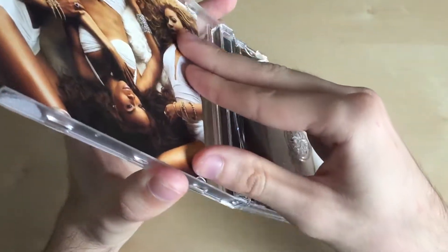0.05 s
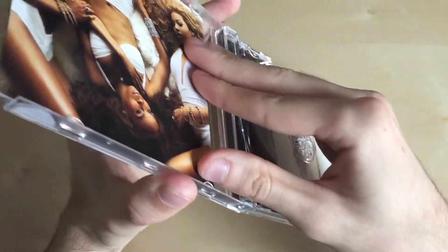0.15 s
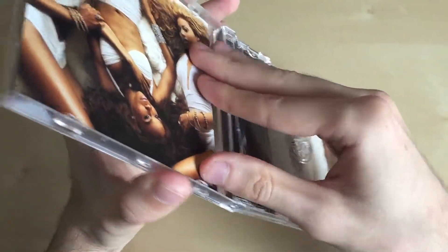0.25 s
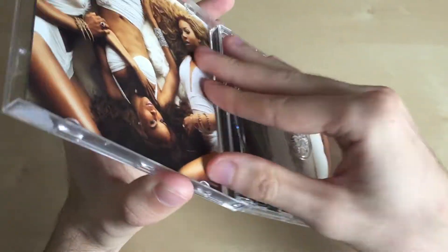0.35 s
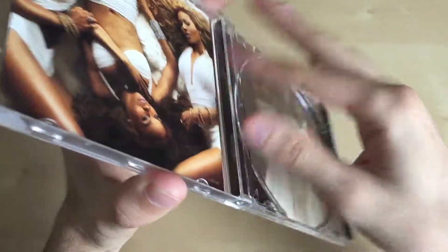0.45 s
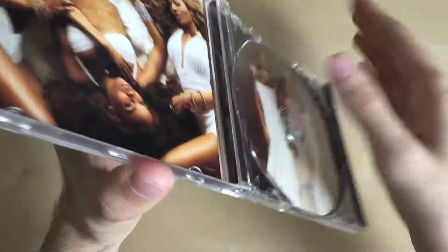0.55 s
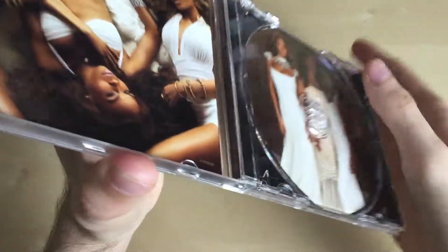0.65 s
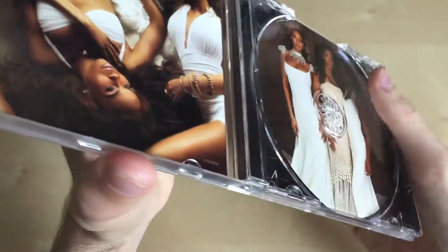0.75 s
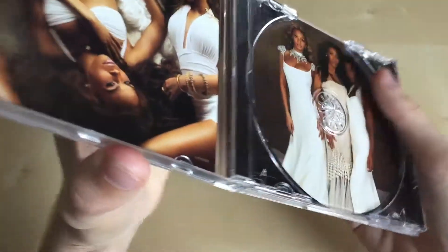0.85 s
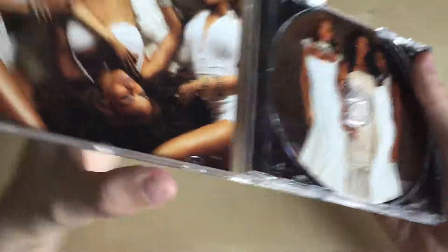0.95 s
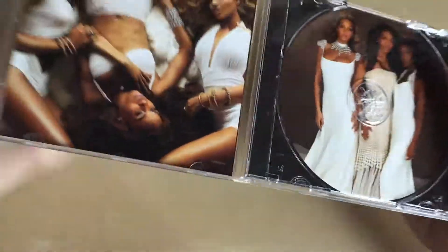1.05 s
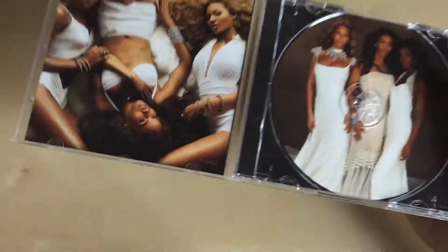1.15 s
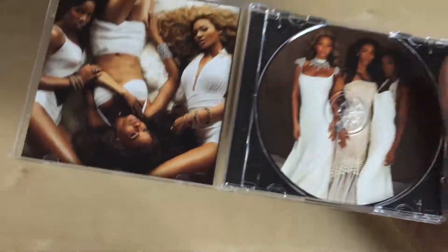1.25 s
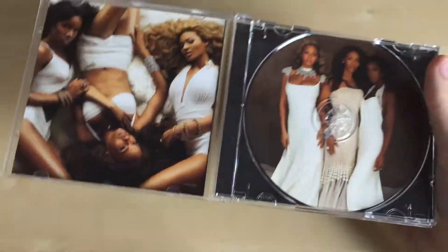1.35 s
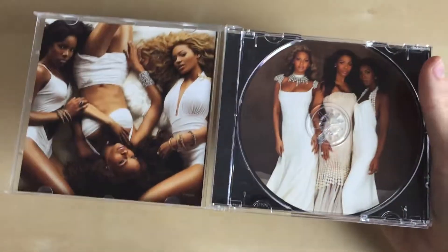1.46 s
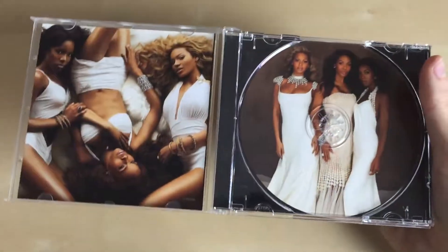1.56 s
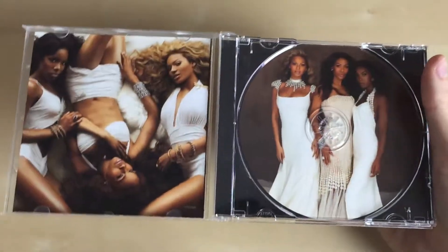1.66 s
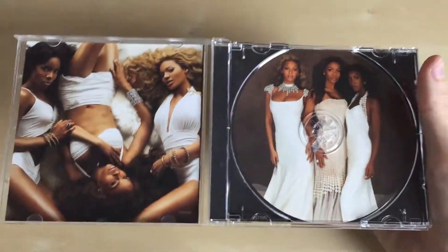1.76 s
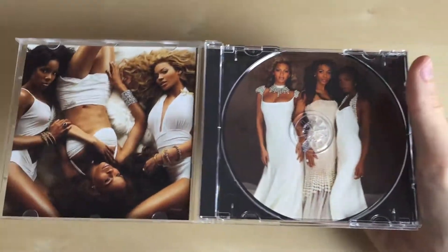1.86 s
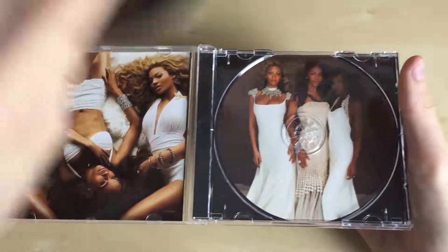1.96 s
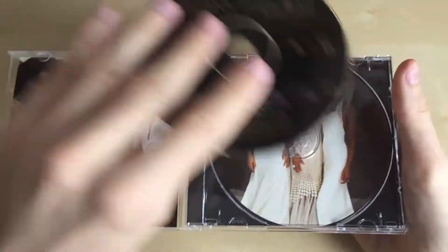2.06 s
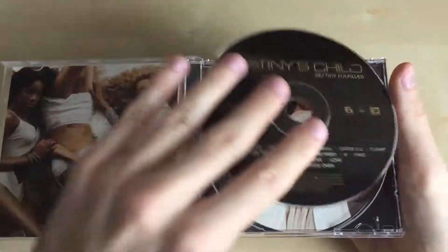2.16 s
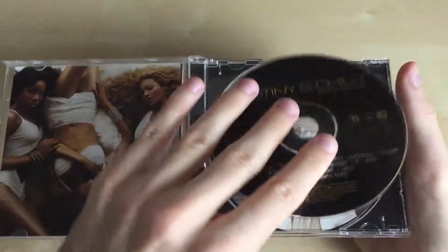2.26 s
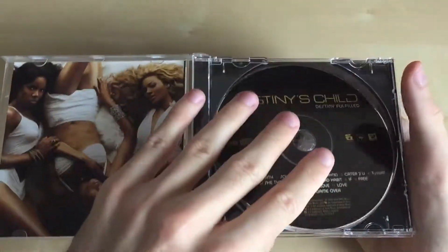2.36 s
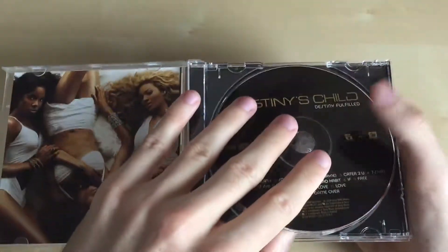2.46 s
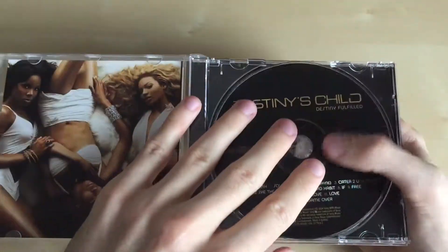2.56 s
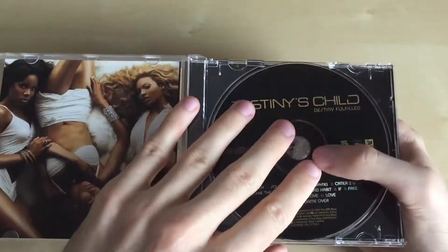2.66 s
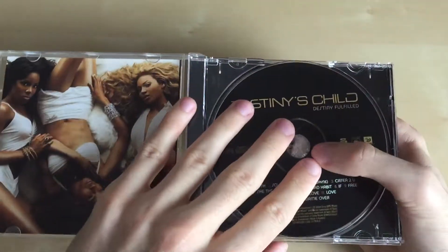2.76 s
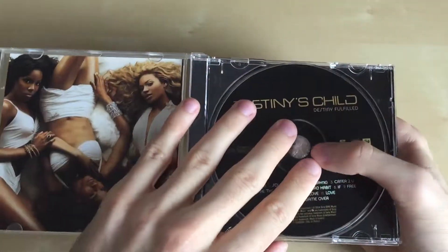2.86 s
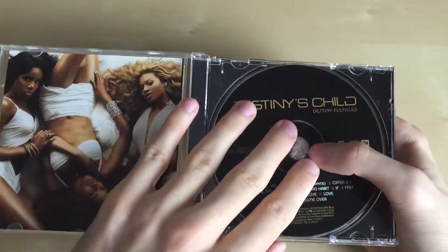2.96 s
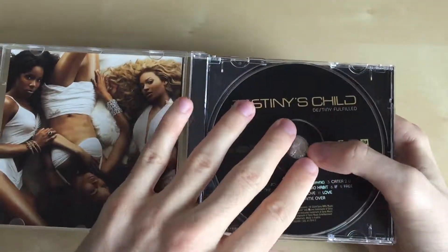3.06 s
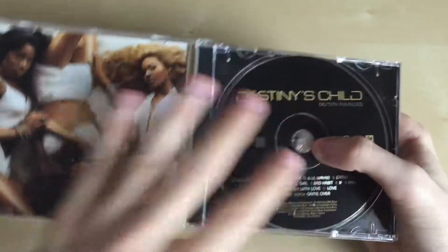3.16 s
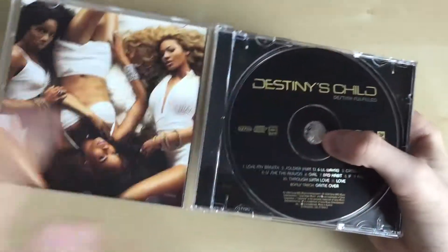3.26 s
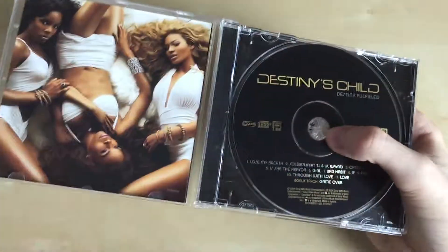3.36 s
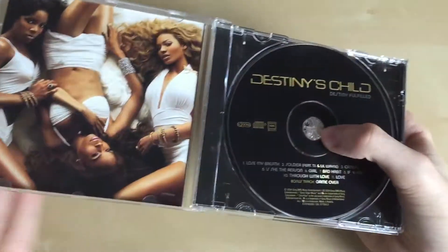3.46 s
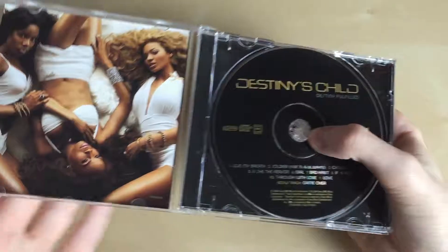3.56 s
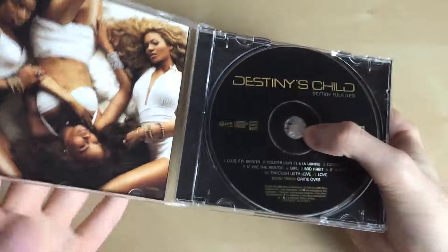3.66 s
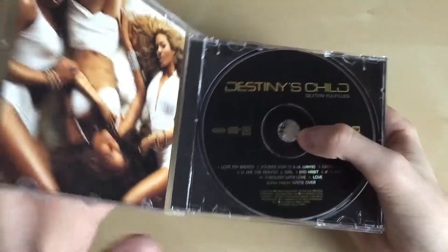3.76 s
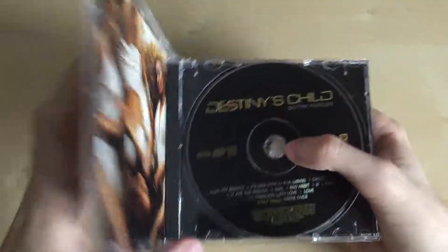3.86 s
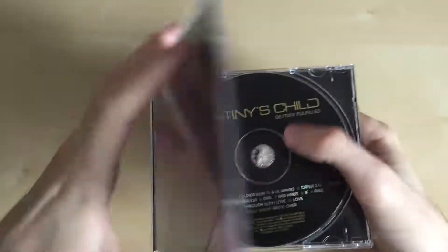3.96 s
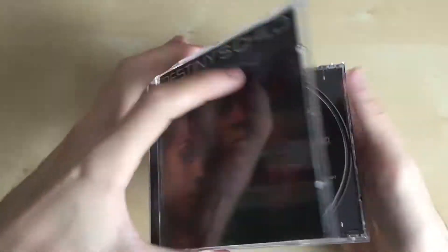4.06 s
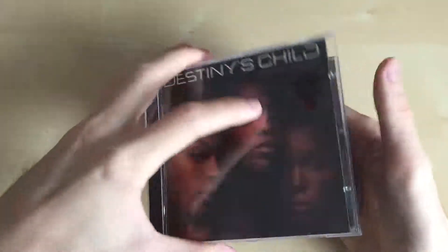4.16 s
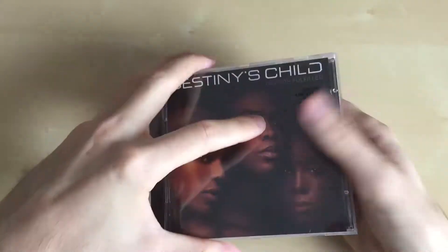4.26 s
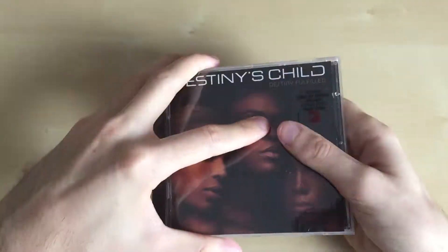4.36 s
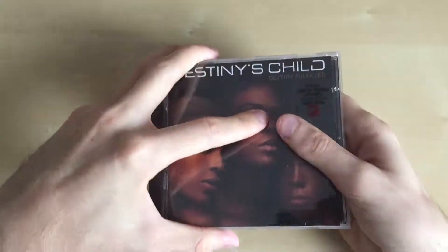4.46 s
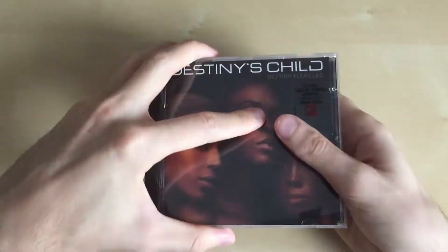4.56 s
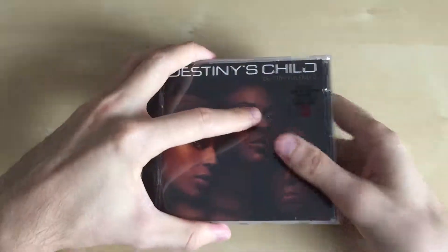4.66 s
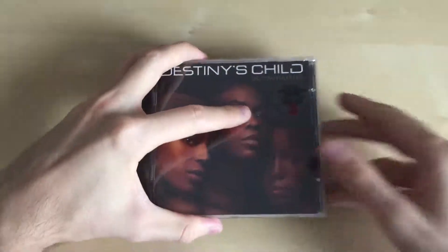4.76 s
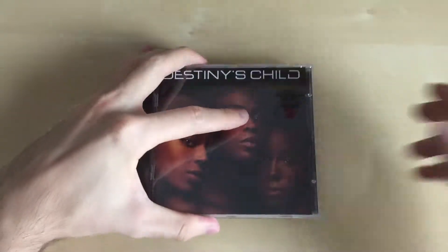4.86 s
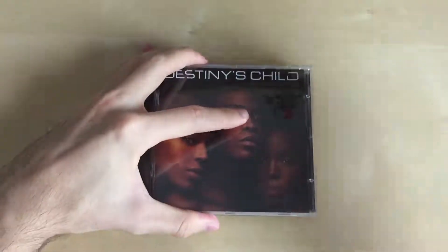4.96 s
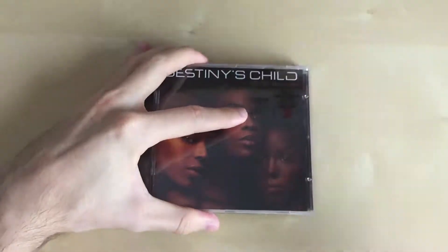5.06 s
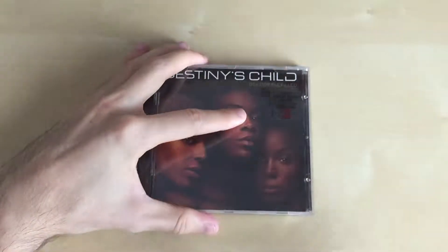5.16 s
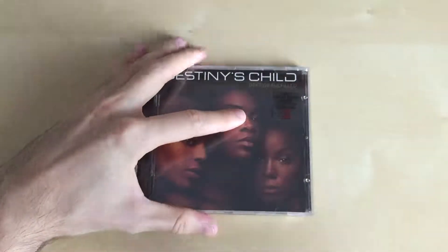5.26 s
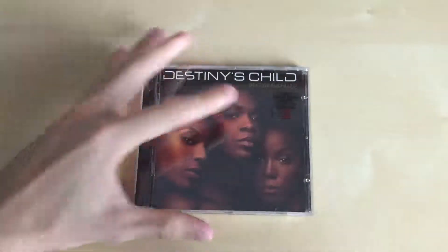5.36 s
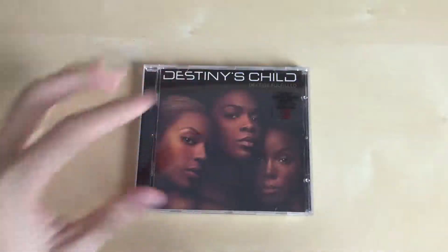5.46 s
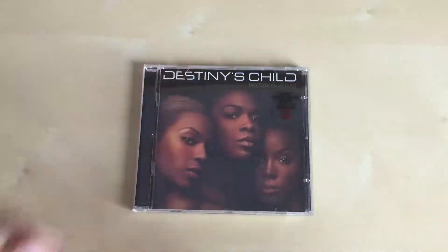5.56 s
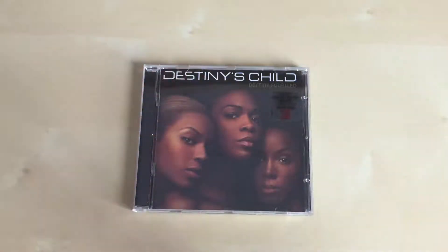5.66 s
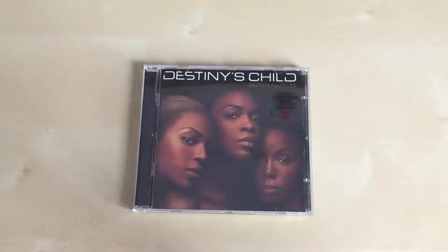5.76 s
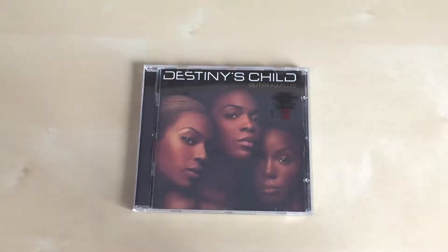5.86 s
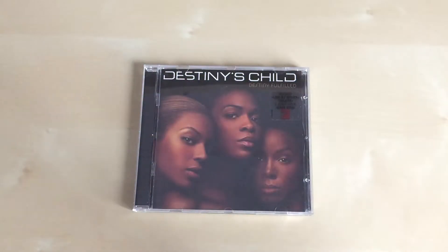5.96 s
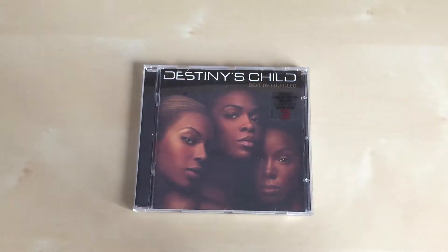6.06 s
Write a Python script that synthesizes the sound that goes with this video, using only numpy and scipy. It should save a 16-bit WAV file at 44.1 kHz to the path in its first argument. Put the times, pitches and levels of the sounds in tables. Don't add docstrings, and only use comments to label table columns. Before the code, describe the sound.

Close, dry handling of a brittle plastic disc case in a small room, with faint low appliance hum and hiss throughout. From 0 to 0.2 s there are light fingertip taps and soft brushing; around 0.4 s a small cluster of clicks, then a dull hinge rub and creak until 0.6 s. A clear tap lands at about 1.08 s, followed by near-quiet with barely audible rubs. At 2.4-2.5 s sharp bright snaps burst out, then rattling and straining lead to the loudest hard snap at 2.65 s, ringing for about half a second. Another crisp snap comes at 2.9 s and a moderate click at 3.7 s. After tiny creaks, the lid rattles and latches at 4.33-4.42 s with a hard clack. Faint touches follow, then taps at 5.2 s and a final click with a low wooden table thud at 5.34 s. Only background remains until 6 s.

```python
import sys
import numpy as np
from scipy import signal
from scipy.fft import rfft, irfft
from scipy.io import wavfile
from scipy.ndimage import uniform_filter1d

SR = 44100
rng = np.random.default_rng(int(sys.argv[2]) if len(sys.argv) > 2 else 0)


def invert_db(x):
    u = np.asarray(x, float) / 20
    return 10 ** u


def unload_audio(sound):
    columns = np.transpose(np.atleast_2d(sound))
    steps = np.round(np.clip(columns, -1, 1) * 32767)
    wavfile.write(sys.argv[1], SR, steps.astype(np.int16))


N = 269892


def rms_one(x):
    return x / np.sqrt(np.mean(x ** 2) + 1e-24)


def band(x, low_hz, high_hz):
    return signal.sosfilt(signal.butter(2, [low_hz, high_hz], "band", fs=SR, output="sos"), x)


def resonance(x, hz, width_hz):
    r = np.exp(-np.pi * width_hz / SR)
    poles = [1, -2 * r * np.cos(2 * np.pi * hz / SR), r * r]
    return signal.lfilter(np.array([1, 0, -1]) * (1 - r * r) / 2, poles, x)


def add(track, sound, s):
    i = max(round(s * SR), 0)
    track[i:i + len(sound)] += sound[:N - i]


def at_level(x, span, level_db):
    return invert_db(level_db) * x / np.sqrt(np.mean(band(x, 1500, 5000)[:span] ** 2))


def causal(level_db):
    cepstrum = irfft(np.log(invert_db(level_db)))
    half = len(cepstrum) // 2
    cepstrum[1:half] *= 2
    cepstrum[half + 1:] = 0
    return np.exp(rfft(cepstrum))


# t/s, level/dB, lows/dB, highs/dB
SNAPS = [(0.3852, -44, -14.5, -1), (0.391, -55, 2, -6), (0.4077, -67, 19, -28), (1.0489, -56.5, -5, -4),
         (1.533, -80, 19, -15), (2.4151, -30.5, -15, -3.5), (2.4619, -30.5, -16.5, -6.5),
         (2.4761, -35, -14, -4), (2.6469, -35.5, 3, -4.5), (2.6765, -39, -14, -3),
         (2.4185, -36.5, -10.5, -1.5), (0.1598, -45.5, -2, -10.5), (2.8953, -38.5, -12.5, 1),
         (2.898, -42.5, -6, 4.5), (3.6953, -46.5, -14.5, -8), (5.3315, -48, -2, -6), (3.1407, -68, -17, 8),
         (3.236, -67.5, -5, 1), (4.174, -60.5, -13.5, -20), (4.3291, -53.5, -36, -7.5),
         (4.352, -71, -18, -15), (4.7144, -68.5, -2, -4), (5.3418, -36, -8, -10)]


def snaps():
    return clicks(SNAPS, contact_ms=1.8)


# t/s, level/dB, lows/dB, highs/dB
TAPS = [(0.0017, -49.5, -10, -7), (0.138, -63.5, -1, -6), (0.166, -48, -14, -15), (0.1822, -50, -3, -10),
        (0.4003, -48, -19, -14), (0.994, -56, 3, -2), (0.999, -57, 0, -49), (1.009, -59, -9, 2),
        (1.0767, -36.5, -1, -6), (1.0835, -69, -17, -6), (1.0925, -70, 6, -10), (1.5164, -78, 17, -16),
        (2.6569, -23.5, -15.5, -4), (2.8927, -36, -29, -7), (2.8995, -48, -6, -14),
        (3.7018, -41, -10.5, -4), (3.7177, -67, 3, 7), (3.8, -72, -3, -4), (3.9885, -73, -16, -2),
        (4.185, -60, -17.5, -9), (4.2239, -71.5, -15, -5), (4.3243, -54, -16.5, -7),
        (4.361, -60.5, -11, -16), (4.4052, -39, -6, -6), (4.4238, -48.5, -12, -6), (4.3826, -61, -5, -18),
        (4.4105, -41, -4, -4), (4.4074, -31.5, -10.5, -5), (5.193, -38.5, -13.5, -11),
        (5.2045, -52.5, -3, -6), (5.222, -56.5, -2, -15), (5.3195, -54.5, -14, -10)]


def taps():
    return clicks(TAPS, contact_ms=2.6)


# t/s, level/dB, lows/dB, highs/dB
RATTLES = [(0.0068, -44.5, -10, -9.5), (0.1519, -66, -11, -9), (0.1603, -53, 3.5, -12),
           (0.4329, -51.5, -5.5, -25), (0.484, -64, -2, -38), (0.4994, -58, 14, -16),
           (2.3886, -70.5, 10, -19), (2.598, -52, -9, -9), (2.6795, -41, -0.5, -5.5),
           (2.6195, -49.5, -10, -9.5), (2.625, -45, -11.5, -3.5), (2.6315, -47.5, -9, -11.5),
           (2.604, -52, -7.5, -15), (2.7005, -50, -9, -7), (2.422, -45, -1, -11.5), (0.376, -52, -4, -14),
           (3.6905, -59, 1, -5), (4.101, -66.5, -19, -8.5), (4.342, -41.5, 1.5, -7.5), (5.331, -52, 6, -23),
           (5.3393, -42.5, 3, -6), (5.357, -63, -3, -9)]


def rattles():
    return clicks(RATTLES, contact_ms=3.8)


def clicks(contacts, contact_ms):
    near, far, t = np.zeros(N), np.zeros(N), np.arange(2000) / SR
    length = max(contact_ms - .8, .15) / 1000
    for s, level_db, lows_db, highs_db in contacts:
        slips = rng.standard_normal(2000) * invert_db(2.7 * rng.standard_normal(2000))
        chatter = slips * (1 - np.exp(-t / (0.46 * length))) * np.exp(-t / (1.7 * length))
        force = signal.lfilter([1], [1, -.45], chatter) / np.linalg.norm(chatter)
        force[round(.6 * length * SR)] += 0.69 / (1 + (contact_ms / 3.4) ** 4)

        body_db = plate(s, lows_db, highs_db, damping=0.87)
        spectrum = rfft(force, 8192)
        force_db = 20 * np.log10(np.abs(spectrum) + .05)
        chance_db = uniform_filter1d(force_db, size=45) - uniform_filter1d(force_db, size=800)
        struck = spectrum * causal(body_db - 0.7 * chance_db)
        sound = at_level(irfft(struck), 260, level_db + 2.5)[:4000]
        add(near, sound, s - .0003)

        even = irfft(causal(evened(body_db)))[:4000]
        add(far, even * np.linalg.norm(sound) / np.linalg.norm(even), s)
    return near, far


# start t/s, end t/s, level/dB, lows/dB, highs/dB
STRAINS = [
    (0.334, 0.387, -60, -5, 0.5),
    (0.499, 0.595, -49, 6.5, -12.5),
    (1.055, 1.076, -63, -3, 3),
    (2.597, 2.639, -53, -10.5, -13),
    (2.864, 2.896, -63, -11, -4),
    (3.212, 3.227, -69.5, -17, -11),
    (4.097, 4.171, -71, -4, -7),
    (4.39, 4.406, -51, -7, -10),
    (5.32, 5.336, -47, -3, -15),
]


def strains():
    return rubs(STRAINS, swell_db=17.5)


# start t/s, end t/s, level/dB, lows/dB, highs/dB
SLIDES = [
    (0.2, 0.253, -72, 19, -16),
    (0.391, 0.43, -61.5, 2, -30),
    (0.499, 0.56, -56, 3, -19),
    (0.969, 0.993, -71.5, 0, 2),
    (1.18, 1.218, -86, -8, 6),
    (1.508, 1.547, -71.5, 9, 3.5),
    (1.606, 1.632, -77.5, 10, 6),
    (1.722, 1.742, -77, -17, 8.5),
    (2.386, 2.412, -59.5, -2, -12),
    (5.18, 5.193, -67, -2, -4),
]


def slides():
    return rubs(SLIDES, swell_db=1)


# start t/s, end t/s, level/dB, lows/dB, highs/dB
BRUSHES = [
    (0.017, 0.075, -63.5, 3.5, -33),
    (0.128, 0.195, -60.5, 4, -13),
    (0.435, 0.465, -68, 3, -41),
    (4.705, 4.717, -70, -4, -4),
    (4.743, 4.795, -78.5, -7, 5),
    (4.851, 4.898, -78.5, 9.5, 13),
]


def brushes():
    return rubs(BRUSHES, swell_db=-7)


def rubs(strokes, swell_db):
    out = np.zeros((2, N))
    for start, end, level_db, lows_db, highs_db in strokes:
        span = max(round((end - start) * SR), 100)
        along = np.arange(6000) / span
        pressure = invert_db(swell_db * np.minimum(along, 1))
        pressure = pressure * np.clip(along * 9.3, 0, 1) * np.clip((1 - along) * 11.0, 0, 1)
        slips = rng.standard_normal(6000) * invert_db(2.5 * rng.standard_normal(6000))
        judder = invert_db(2.7 * rms_one(uniform_filter1d(rng.standard_normal(6000), size=70)))
        force = rfft(slips * judder * pressure, 8192)
        body_db = plate(start, lows_db, highs_db, damping=1.1)
        for track, colour_db in zip(out, [body_db, evened(body_db)]):
            sound = irfft(force * causal(colour_db))
            add(track, at_level(sound, span, level_db - 0.5)[:7000], start)
    return out


# f/Hz, width/Hz, level/dB
LID = [(310, 49, 10.5), (603, 25, 9.5), (1360, 820, 0), (2530, 36, -10), (3320, 77, -7), (3610, 170, -8.5),
       (4650, 82, -23), (6450, 270, -10), (9000, 500, -13), (12100, 410, -13)]
HINGE = [(320, 24, -8.5), (553, 76, -11.5), (1038, 33, -5.5), (1510, 190, -2.5), (1920, 55, -6),
         (2450, 220, -7), (2870, 45, -14), (3370, 120, -9), (4250, 50, -28), (6470, 41, -29)]
FLAT = [(1220, 150, -2), (2020, 300, 3.5), (2620, 560, 5), (3060, 55, 0), (3430, 73, 2), (3900, 120, -2),
        (5100, 220, -9.5), (5710, 58, -15), (6670, 120, -15), (9100, 98, -19)]
# f/Hz, width/Hz, level/dB
RIM = [(1120, 56, -8.5), (2080, 160, -1)]
DROPPED = [(1630, 37, -0.5), (2470, 96, -7), (3040, 110, -7), (3220, 77, -6), (3900, 76, 1.5),
           (4340, 110, -9), (6290, 100, -6), (6900, 120, -10), (8500, 130, -12), (8760, 140, -13.5),
           (10800, 88.2, -16), (12500, 150, -8.5), (13010, 110, -12)]
# f/Hz, width/Hz, level/dB
BEND = [(950, 54, -0.5), (1550, 88, -4.5)]
TRAY = [(1620, 95, -5), (2400, 220, -9.5), (3010, 80, 5), (3700, 82, -23.5), (5670, 330, -16),
        (6300, 91, -13), (7200, 120, -19.5), (8200, 90, -20.5), (8750, 290, -22.5), (9890, 188, -22),
        (11100, 78, -27.5), (12040, 61, -20), (12460, 234.3, -23)]
# f/Hz, width/Hz, level/dB
HUB = [(1000, 16, 1), (1370, 83, -9.5), (2023, 33, -4), (2460, 39, -7.5), (2920, 23, -7), (3045, 120, -3.5),
       (3700, 190, -8), (4482, 85, -10), (6260, 350, -15), (7200, 200, -19.5), (8322, 110, -11),
       (9200, 110, -16.5), (11530, 83, -13), (12940, 130, -20.5)]
GRIPPED = [(1040, 94, -7), (2480, 110, -6.5), (3050, 130, 1), (3750, 190, -5), (4260, 76, -14.5),
           (4540, 170, -12.5), (6090, 210, -13.5), (6600, 140, -18), (7440, 280, -18), (8320, 110, -11.5),
           (9200, 100, -20), (9900, 93, -18), (11300, 96, -13.5), (12840, 110, -24.5)]
PRESSED = [(1630, 40, -2), (2140, 79, 2.5), (3050, 210, 2), (3524, 60, -1.5), (4357, 70, -1),
           (5980, 30, -8), (6800, 50, -7.5), (7350, 110, -7), (9650, 150, -7.5), (11400, 100, -13),
           (14900, 61, -40)]
LIFTED = [(1318, 54, 5.5), (2240, 87, -0.5), (3220, 130, 2), (3740, 90, 1), (4933, 71, -26.5),
          (6100, 45, -13), (7900, 58, -15), (9500, 300, -13), (11300, 52, -11)]
# f/Hz, width/Hz, level/dB
TOUCHED = [(1700, 210, 2), (2810, 85, -23), (3340, 93, -5.5), (3900, 280, -8), (4800, 260, -13),
           (5400, 120, -15), (7400, 170, -7), (8440, 190, -18), (9210, 110, -18), (12100, 310, -17)]
MET = [(966, 91, -2.5), (1466, 95, 1.5), (1890, 92, -10), (2330, 72, -8.5), (2890, 87, -8), (3400, 100, -8),
       (3730, 110, -8), (5940, 220, -11), (6880, 260, -11), (12300, 110, -26)]
LATCHED = [(1030, 49, -5), (1610, 150, -2.5), (2126, 320, -1), (2980, 160, -7.5), (3380, 100, -7),
           (3750, 150, -11), (4500, 140, -13.5), (6080, 210, -11), (7300, 100, -13), (8900, 130, -14),
           (9800, 170, -17.5), (10900, 180, -14), (11700, 150, -18)]
# f/Hz, width/Hz, level/dB
LAID = [(610, 15, -1), (1033, 55, 1), (1240, 180, 4), (1540, 29, -4), (1810, 100, -3), (2900, 48, -9),
        (3550, 97, -16), (5460, 95, -20), (6100, 51, -17), (9300, 210, -28), (11400, 140, -33.5),
        (14200, 300, -14)]
SET_DOWN = [(1000, 110, -5), (1280, 130, 0), (1880, 160, 0.5), (2604, 120, -4), (3360, 76, -9),
            (3820, 100, -12), (4370, 170, -4), (5500, 100, -8), (6450, 64, -12), (7800, 120, -7),
            (8960, 270, -18), (12300, 490, -29)]
# f/Hz, width/Hz, level/dB
EDGES = [(15100, 2700, -17.5)]
# from t/s, modes, dense modes between level/dB, edge f/Hz below which it hardly radiates
BODIES = [(0, LID + EDGES, -9.5, 300), (.49, HINGE, -23, 300), (.8, FLAT, -19.5, 503),
          (2.2, RIM + DROPPED + EDGES, -13, 198), (2.45, BEND + TRAY, -11, 130.7),
          (2.55, HUB, -18.5, 521.8), (2.652, GRIPPED + EDGES, -15, 595), (2.67, HUB + EDGES, -14.5, 500),
          (2.8, BEND + PRESSED, -9.5, 450), (3.0, BEND + LIFTED, -4.5, 720), (4.3, TOUCHED, -20, 810),
          (4.338, MET + EDGES, -14, 404.3), (4.37, LATCHED + EDGES, -13.5, 603), (4.6, LAID, -10.5, 300),
          (5.1, SET_DOWN + EDGES, -6, 500), (5.3, LAID, -13, 300)]


def plate(s, lows_db, highs_db, damping):
    hz = np.maximum(np.arange(4097) * SR / 8192, 10)
    _, modes, between_db, edge_hz = [body for body in BODIES if body[0] <= s][-1]
    feed_db = 1.5 * rng.standard_normal(30)
    power = invert_db(between_db) ** 2 / (1 + (edge_hz / hz) ** 3) / (1 + (hz / 5000) ** 2)
    for extra_db, (mode_hz, width, db) in zip(feed_db, modes):
        damped_hz = damping * width + 0.042 * mode_hz
        power = power + invert_db(db + extra_db) ** 2 / (1 + (2 * (hz - mode_hz) / damped_hz) ** 2) ** 1.5

    ranges = [(hz > low) & (hz < high) for low, high in [(400, 1500), (1500, 5000), (5000, 15000)]]
    have_db = [10 * np.log10(power[r].sum()) for r in ranges]
    wanted_db = np.array([lows_db, 0, highs_db])
    tilt_db = np.interp(np.log(hz), np.log([900, 2700, 7500]), wanted_db - have_db)
    soft_db = 1.4 * min(highs_db + 5.5, 0) * np.maximum(np.log2(hz / 6000), 0)
    top_db = -10.0 * np.maximum(np.log2(hz / 12000), 0)
    return 10 * np.log10(power) + tilt_db + soft_db + top_db


def evened(body_db):
    kept = 0.63
    return kept * body_db + (1 - kept) * uniform_filter1d(body_db, size=120)


# start t/s, length t/s, f/Hz, width/Hz, level/dB
CREAKS = [(0.432, 0.019, 300, 80, -48), (0.53, 0.042, 1480, 180, -51), (0.572, 0.021, 1410, 500, -49),
          (0.996, 0.01, 850, 200, -49.5), (0.525, 0.052, 6450, 150, -68), (2.394, 0.016, 2500, 250, -65),
          (2.622, 0.014, 3100, 600, -52), (3.23, 0.011, 2780, 406, -57.5), (3.232, 0.0046, 1500, 247, -60),
          (3.798, 0.022, 797, 117.2, -67.5), (3.985, 0.028, 2470, 202, -69.5),
          (4.067, 0.019, 416, 79.3, -73.5), (4.105, 0.1, 2320, 300, -67.5), (4.107, 0.03, 3560, 400, -72),
          (4.171, 0.0068, 2085, 200, -54), (4.717, 0.015, 1360, 250.6, -54.5),
          (4.75, 0.057, 5970, 494, -77.5), (4.85, 0.049, 6800, 1500, -72.5)]


def creaks():
    out = np.zeros(N)
    for start, length, hz, width_hz, db in CREAKS:
        along = np.arange(5000) / SR / length
        slips = rng.standard_normal(5000) * invert_db(3.0 * rng.standard_normal(5000))
        slips = slips * np.clip(along * 5.4, 0, 1) * np.clip((1.2 - along) * 1.8, 0, 1)
        sound = resonance(resonance(slips, hz, width_hz), hz, 2 * width_hz)
        add(out, invert_db(db) * rms_one(sound) * np.sqrt(SR * length / 5000), start)
    return out


# t/s, f/Hz, level/dB, t60/s
RINGS = [(2.465, 1570, -60, .4), (2.465, 2020, -61.5, .4), (2.465, 2470, -63, 0.36),
         (2.464, 3040, -57.5, .4), (2.465, 3750, -63, .4), (2.66, 1027, -52.5, 0.55),
         (2.675, 1338, -57, 0.46), (2.675, 2007, -52, .5), (2.675, 2420, -58.5, 0.55),
         (2.674, 2600, -59, .4), (2.659, 3080, -53.5, .5), (2.66, 3740, -51, 0.6), (2.675, 4317, -58.5, .4),
         (2.675, 5696, -55, .4), (2.897, 988, -63, 0.33), (2.898, 2140, -66, 0.21),
         (2.897, 3100, -61.5, 0.32)]


def rings():
    out, t = np.zeros(N), np.arange(SR // 2) / SR
    for s, hz, db, t60 in RINGS:
        tone = rms_one(resonance(rng.standard_normal(SR), hz, width_hz=26)[SR // 2:])
        add(out, invert_db(db - 3.5 - 60 * t / t60) * np.clip(t / .003, 0, 1) * tone, s)
    return out


# t/s, peak level/dB
KNOCKS = [(1.073, -61), (1.529, -64), (2.414, -66), (2.649, -57.5), (2.904, -61), (3.697, -65),
          (4.406, -64), (4.852, -63), (5.009, -60.5), (5.209, -59), (5.341, -51.5)]
# f/Hz, level/dB, t60/s
TABLE = [(53.64, 12.5, 0.12), (97.3, 3.5, 0.43), (140, -3.5, 0.49), (184.8, -8.5, .07), (274, -10.5, 0.13)]


def table():
    out, t = np.zeros(N), np.arange(SR // 2) / SR
    for s, peak_db in KNOCKS:
        for hz, db, t60 in TABLE:
            ring = np.sin(2 * np.pi * hz * t) * invert_db(-60 * t / t60) * (1 - np.exp(-t / .004))
            add(out, invert_db(peak_db + db + 3 + 1.4 * rng.standard_normal()) * ring, s)
    return out


# f/Hz, t60/s, level/dB
ROOM = [(300, 1, -15), (676, 0.13, -11), (1146.4, 0.27, -12.5), (1930, 0.37, -15.5), (3100, 0.37, -19.5),
        (5200, 0.47, -16.5), (8580, 0.34, -23), (13200, 0.38, -25.5)]


def room(x):
    t = np.arange(SR // 2) / SR
    tail = 0
    for hz, t60, db in ROOM:
        decay = invert_db(-60 * t / t60 - 7.0 * (t / 0.3) ** 3) * np.clip((t - .002) / 0.0024, 0, 1)
        echo = band(rng.standard_normal(len(t)), hz / 1.3, min(hz * 1.36, 17000)) * decay
        tail = tail + invert_db(db) * rms_one(echo) * np.sqrt((hz / (SR / 2)) / len(t))
    return signal.fftconvolve(x, tail)[:N]


def gated(x):
    gate_db = -75
    power = uniform_filter1d(x ** 2, size=600) ** 2
    return x * power / (power + invert_db(2 * gate_db) ** 2)


# f/Hz, density level/dB
HISS = [(82, -27.5), (140, -5), (205, -12.5), (400, -20.5), (2300, -24), (12000, -33.5), (15200, -35.5),
        (16500, -49)]
# f/Hz, width/Hz, level/dB
HUM = [(49.7, 13, -77), (102, 44, -73), (144.4, 6.5, -81.5)]


def background():
    air_db, motor_hz, motor_db = -73, 48.5, -69
    drone_db, waver_db, waver_s = -75, 7.5, .12
    white = rng.standard_normal((5, N + SR))
    t = np.arange(N) / SR

    hz = np.maximum(np.arange(N // 2 + 1) * SR / N, 1)
    hiss_hz, hiss_db = np.transpose(HISS)
    shape = invert_db(np.interp(np.log(hz), np.log(hiss_hz), hiss_db))
    hiss = irfft(rfft(white[0, :N]) * shape, N)
    hiss = invert_db(air_db) * hiss / np.std(band(hiss, 80, 22000))

    hum = 0
    for noise, (f, wide, db) in zip(white[1:], HUM):
        hum = hum + invert_db(db) * rms_one(resonance(resonance(noise, f, wide), f, wide)[SR:])

    steps = np.arange(0, N / SR + 1, waver_s)
    swell_db = drone_db + waver_db * np.interp(t, steps, rng.standard_normal(len(steps)))
    drone = invert_db(swell_db) * rms_one(resonance(resonance(white[4], 95, 39), 95, 39)[SR:])

    wander = np.cumsum(rms_one(band(white[2], 4.5, 30))[SR:]) * 60 / SR
    motor = invert_db(motor_db) * np.sqrt(2) * np.sin(2 * np.pi * motor_hz * t + wander)
    return hiss + motor + hum + drone


def scene():
    near, far = np.add.reduce([snaps(), taps(), rattles(), strains(), slides(), brushes()])
    singing = creaks()
    echoes = gated(room(far + singing) + rings())
    return (near + singing + echoes + table() + background())[None]


def band_limit(x):
    return signal.sosfilt(signal.butter(12, 16820, fs=SR, output="sos"), x)


def record(dry):
    heard = signal.sosfilt(signal.butter(4, 40, "high", fs=SR, output="sos"), dry)
    heard = signal.sosfilt(signal.cheby2(14, 50, 16800, fs=SR, output="sos"), heard)
    return band_limit(heard)


dry = scene()
out = record(dry)
unload_audio(out)
```